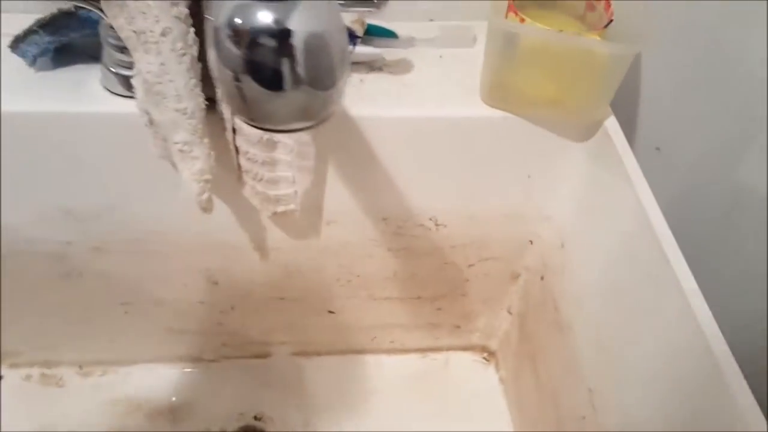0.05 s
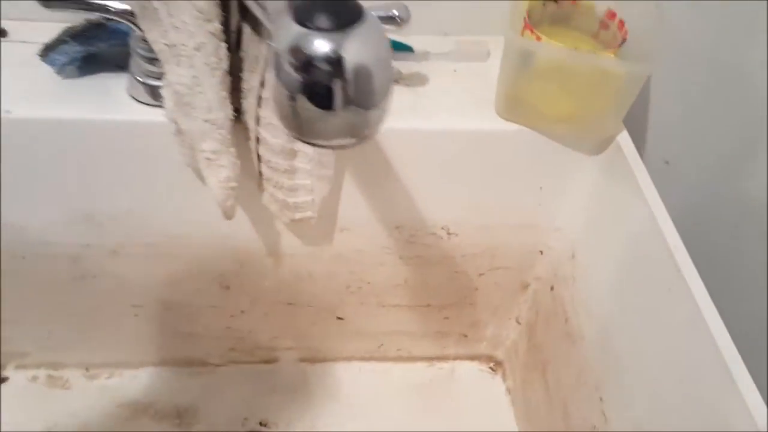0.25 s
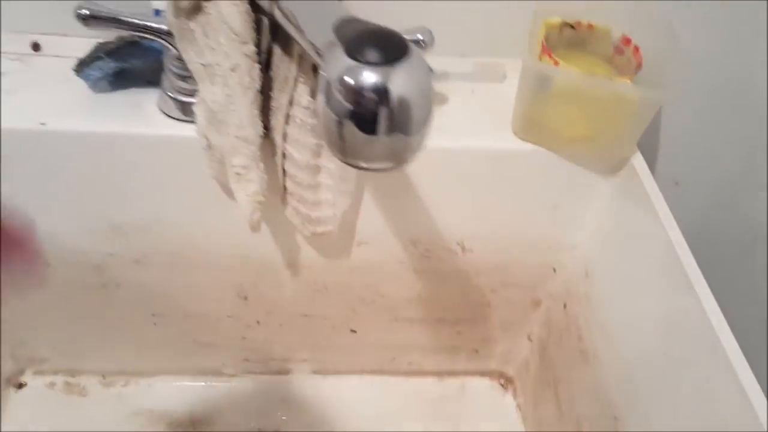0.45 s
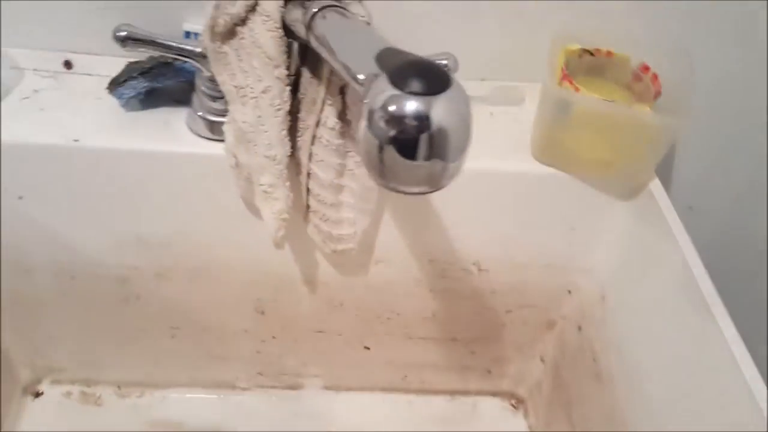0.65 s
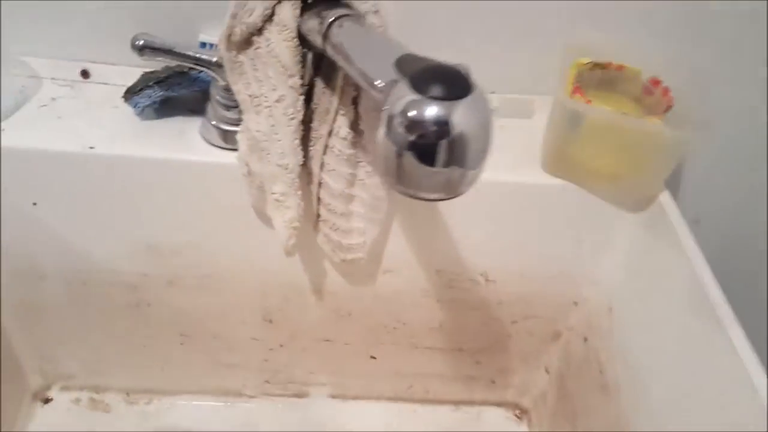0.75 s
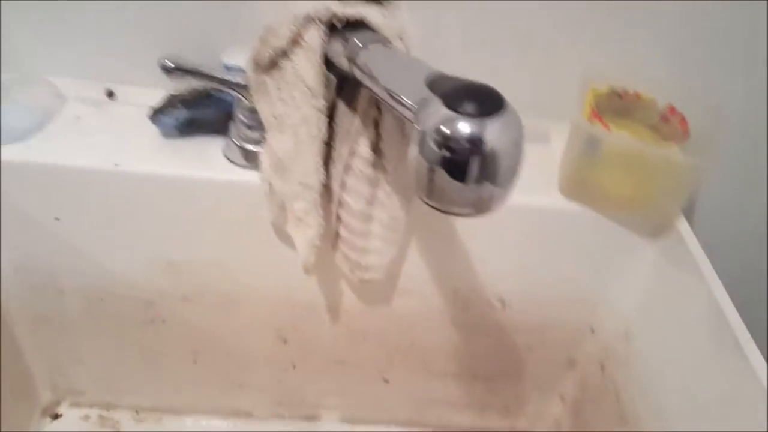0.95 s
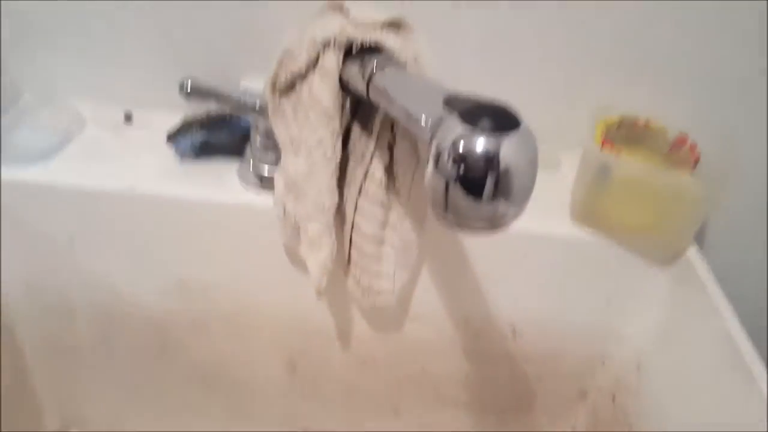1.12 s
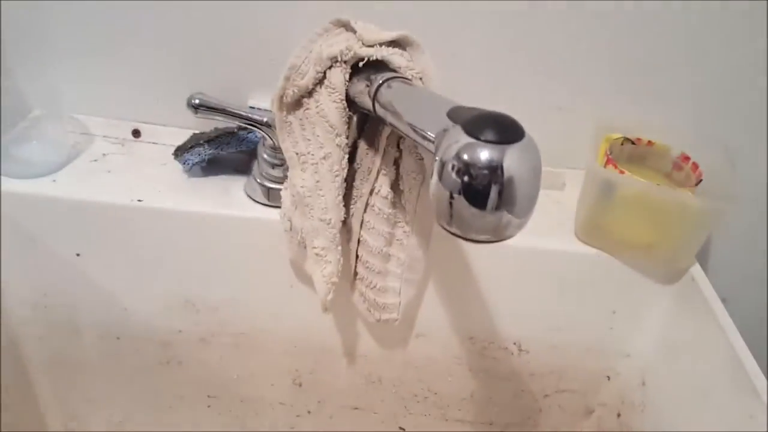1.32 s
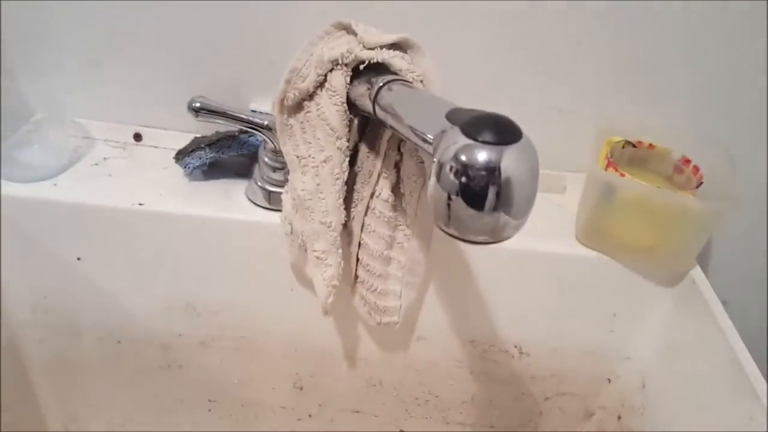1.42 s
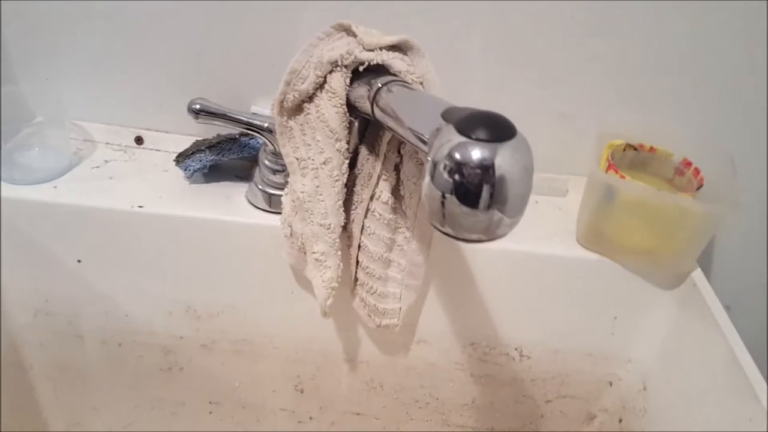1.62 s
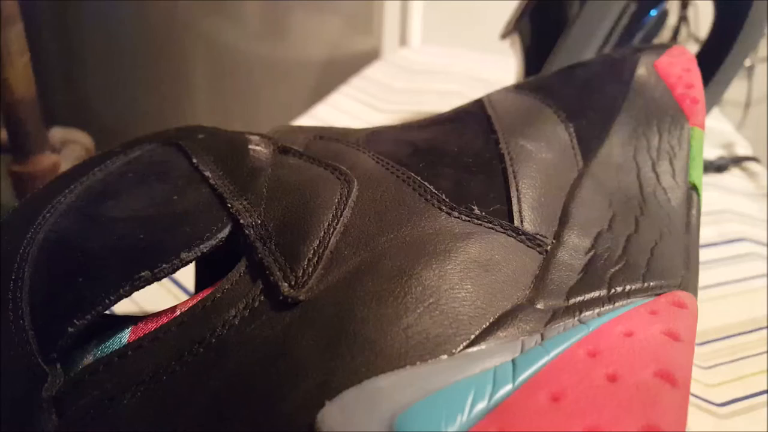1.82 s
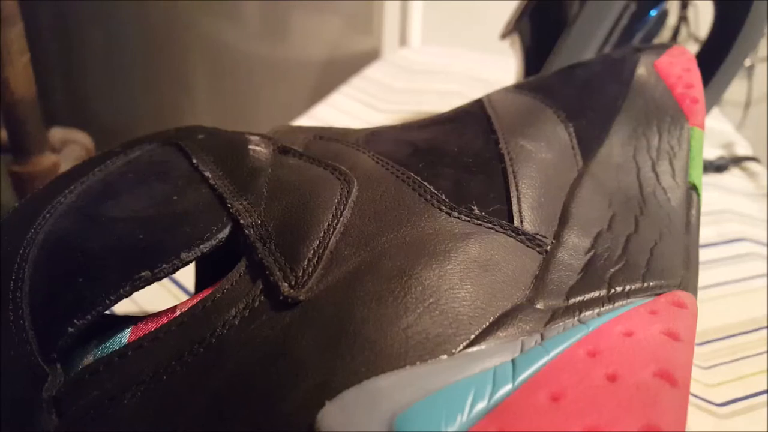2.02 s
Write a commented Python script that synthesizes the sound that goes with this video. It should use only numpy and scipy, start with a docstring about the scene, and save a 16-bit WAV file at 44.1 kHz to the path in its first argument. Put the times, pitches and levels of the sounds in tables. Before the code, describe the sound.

Last water drains from a sink with hollow gulps and plinks, small plastic creaks close by.

```python
"""Last water down a sink drain

Water gurgles out of a plastic utility sink: gulps are enveloped noise, plinks of trapped air are short tones,
and the pipe rings as resonances driven by random drops, while the drain's air column booms as a wavering sine.
A hand-held camera creaks at the right as struck modes with bright ticks, and knocks dully once as a short tone;
rumble, hush and a low room hum are filtered noise under all. The sound is then cut to silence.
"""
import sys
import numpy as np
from scipy import signal
from scipy.io import wavfile
from scipy.ndimage import uniform_filter1d

SR = 44100
rng = np.random.default_rng(int(sys.argv[2]) if len(sys.argv) > 2 else 0)


def generate_wav(signal):
    """Clip the signal to [-1, 1] and save it as 16-bit WAV at the path in sys.argv[1]."""
    frames = np.transpose(np.atleast_2d(signal))
    scaled = np.clip(frames, -1, 1) * 32767
    pcm = np.round(scaled).astype(np.int16)
    wavfile.write(sys.argv[1], SR, pcm)


N = 91110  # samples

# Stereo field of the noises: (frequency [Hz], left-right likeness [0-1])
LIKENESS = [(60, 0.57), (150, 1), (700, 0.21), (15000, 0.067)]
# Stereo balance of the noises: (frequency [Hz], left minus right [dB])
LEAN = [(60, 2), (1300, 0.5), (15000, 3)]
LEFT_LAG_S = -0.00033  # negative: the left channel leads

# Room rumble over time: (time [s], level [dB])
RUMBLE = [(0, -41.5), (.4, -54), (.7, -51), (1.2, -48.5), (1.68, -53.5), (1.71, -58)]
# Rumble spectrum: (frequency [Hz], relative density [dB])
RUMBLE_SHAPE = [(25, -40.5), (58, -1), (90, -27), (107, 4), (135, -4.5), (165, -1.5), (210, -17.5)]
# Room hush spectrum: (frequency [Hz], relative density [dB])
HUSH_SHAPE = [(430, -30.5), (650, 8.5), (1000, 3.5), (2400, -.5), (4400, -7), (4800, -24), (15900, -54.5)]
HUSH_DB, RUMBLE_PATCHY_DB, HUSH_PATCHY_DB = -55, 2.0, 2.0
# Room hum, one resonance: (frequency [Hz], width [Hz], left minus right [dB], likeness [0-1])
HUM = (330, 18, 0, .8)
HUM_DB = -54.5

# Camera creaks: (time [s], peak level before CREAK_DB [dB])
CREAKS = [(0.736, -26.5), (0.977, -33), (1.021, -26.5), (1.132, -30.5), (1.167, -23.5), (1.243, -23.5),
          (1.314, -34), (1.327, -30.5), (1.353, -27), (1.372, -28.5), (1.388, -22), (1.403, -27.5),
          (1.426, -27.5), (1.433, -28.5), (1.457, -29.5), (1.463, -35.5), (1.473, -30.5), (1.48, -20.5),
          (1.493, -34), (1.519, -34), (1.528, -42), (1.55, -42), (1.564, -30), (1.569, -21.5),
          (1.588, -36.5), (1.598, -33), (1.616, -32), (1.618, -15.5), (1.631, -26.5), (1.643, -31),
          (1.647, -19), (1.66, -23), (1.668, -32.5), (1.673, -21), (1.68, -26)]
# Modes of the snap: (frequency [Hz], relative level [dB], 60 dB decay time [s])
SNAP_MODES = [(865, -1, 0.015), (1785, 6, 0.0038), (3416, 0.5, 0.0086)]
# Modes of the plastic shell: (frequency [Hz], relative level [dB], 60 dB decay time [s])
SHELL_MODES = [(370, -9, .02), (667, -8, 0.065), (1080, -8.5, 0.052), (1366, -13.5, 0.042),
               (1880, -15.5, 0.037), (2960, -5, 0.016)]
# Level of the bright ticks, before a doubling of amplitude: (time [s], tick level [dB])
TICK = [(.7, -48.5), (1.16, -45), (1.48, -43.5), (1.5, -49.5), (1.6, -38), (1.68, -40)]
CREAK_DB, CREAK_LEFT_DB = 9, -20  # added to every creak; left relative to right
TICK_LOW_HZ, TICK_HIGH_HZ, TICK_T60_S = 4500, 13000, .007
AFTERSLIP_S = .0045  # a slip this soon after another has no tick
SLIP_S, JUDDER, JUDDER_S = .0001, .16, .004  # push width, noise share and its decay time
COLOUR_SPREAD_DB = 50  # per unit of detuning: each slip favours other modes

# Air column of the drain: (time [s], level [dB])
BOOM = [(0, -41.5), (.16, -51.5), (.29, -40.5), (.35, -50), (.396, -32), (.435, -45.5), (.48, -54),
        (.62, -49.5), (.7, -45), (.83, -59), (.865, -27.5), (.89, -30), (.926, -55), (1.014, -42.5),
        (1.08, -64.5)]
BOOM_HZ, BOOM_WAVER_HZ = 247.9, 7.6
BOOM_LEAN_DB, BOOM_LEAD_RAD = -3, 0.25  # left minus right; left phase lead

# Pipe modes: (frequency [Hz], width [Hz], left minus right [dB], left-right likeness [0-1])
PIPE = [(992, 33, -10.5, 0.1), (1803, 34, 1.5, 0.7), (2782, 40, -5.5, 0.4)]
# Steady trickle: (time [s], body level [dB], treble level [dB])
TRICKLE = [(0, -52, -55.5), (.55, -52.5, -58), (.71, -55.5, -63.5), (.82, -54, -62), (.95, -47.5, -60.5),
           (1.35, -51.5, -62), (1.68, -45, -55), (1.7, -59, -67.5)]
# Ringing of each pipe mode relative to the trickle's body: level [dB]
TRICKLE_MODES_DB = [-0.5, -2, -11]
DROPS_PER_S, DROP_SPREAD_DB = 1200, 3.5

# Short tones: plinks of trapped air, and at 0.737 s the dull knock of a camera creak:
# (time [s], pitch [Hz], peak level [dB], length [s])
SHORT_TONES = [(.009, 982, -30.5, 0.0084), (.01, 6840, -35.5, 0.0085), (.012, 3650, -43.5, 0.015),
               (.085, 1046, -26, 0.0089), (.151, 1020, -26, 0.017), (.158, 2720, -48, 0.037),
               (.178, 984, -43, .025), (.213, 1053, -30, 0.012), (.385, 998, -31, 0.023),
               (.385, 1740, -45, 0.022), (.44, 2830, -45, 0.016), (.445, 1009, -37, 0.021),
               (.495, 1008, -36, 0.016), (.553, 1021, -37, 0.02), (.555, 2480, -44.5, 0.012),
               (.566, 3140, -67, 0.0075), (0.737, 665, -25, 0.0045), (.782, 1050, -35, 0.01),
               (.849, 695, -32.5, 0.021), (.853, 2776, -32.5, 0.012), (.857, 1826, -29.5, 0.019),
               (.888, 480, -38, 0.014), (.94, 997, -35, 0.037), (.985, 1000, -32.5, 0.037),
               (1.052, 1018, -34, 0.019), (1.183, 346, -36, 0.019), (1.225, 1741, -32, 0.016),
               (1.25, 1736, -26, 0.019), (1.287, 1730, -31, 0.013)]
TONE_RISE, TONE_LEAN_DB = 0.42, -3.5  # rise as a share of the length; left minus right
BUBBLES_PER_S, BUBBLE_LOW_HZ, BUBBLE_HIGH_HZ = 300, 900, 4500
BUBBLE_S = .014  # length at 1 kHz
BUBBLE_DB, BUBBLE_TILT_DB = -4, -2  # level relative to the trickle's body; change per octave

# Gulps: (time [s], splash level before SPLASH_DB [dB], spray level before SPRAY_DB [dB], length [s])
GULPS = [(.009, -12, -36.5, 0.0058), (.086, -19.5, -45, 0.012), (0.209, -13, -38.5, 0.0078),
         (0.385, -19.5, -57, 0.022), (0.434, -20, -53, 0.019), (0.559, -25, -46, 0.0048),
         (0.602, -21, -45, 0.015), (0.663, -18, -46, 0.023), (0.846, -12, -47.5, .028),
         (0.879, -20, -46.5, 0.032), (0.941, -17, -43, 0.018), (0.967, -20.5, -43, 0.035),
         (1.088, -29, -46, 0.018), (1.182, -18.5, -51, .015), (1.22, -20.5, -50.5, 0.045),
         (1.255, -23, -45.5, 0.022), (1.283, -24, -49, 0.016)]
# Splash spectrum: (frequency [Hz], relative density [dB])
SPLASH_SHAPE = [(71, -50.5), (120, 17), (1000, 11.5), (1350, 6.5), (2850, 4.5), (3800, -6), (5000, -19.5)]
# Treble spray spectrum: (frequency [Hz], relative density [dB])
SPRAY_SHAPE = [(2350, -41.5), (4000, -5.5), (5880, -3), (12100, -8), (15100, -13.5), (15800, -17)]
SPLASH_DB, SPRAY_DB = -22, -8  # added to every gulp
GULP_RISE = .2  # share of the length

CUT_S, OFFSET, EDGE_HZ = 1.822, -.00055, 15950  # end of sound, steady offset, band limit


def amp(db):
    """Decibel law: twenty decibels are a factor of ten in amplitude."""
    return 10 ** (np.asarray(db) / 20)


def evened(x):
    """Normalization to unit rms."""
    return x / np.sqrt(np.mean(x ** 2) + 1e-20)


def read(points, hz):
    """Interpolation on a logarithmic frequency axis."""
    f, value = np.transpose(points)
    return np.interp(np.log(hz + 1), np.log(f + 1), value)


def curve(table, column=1):
    """Amplitude envelope: gain over time from one decibel column."""
    rows = np.array(table)
    return amp(np.interp(np.arange(N) / SR, rows[:, 0], rows[:, column]))


def add(mix, s, sound):
    """Superposition: adds a sound to the mix from time s on."""
    part = mix[..., round(s * SR):][..., :sound.shape[-1]]
    part += sound[..., :part.shape[-1]]


def swell(u, rise):
    """Pulse envelope: a straight rise, then a Gaussian fall."""
    return np.clip(u / rise, 0, 1) * np.exp(-np.maximum(u - rise, 0) ** 2 * 2)


def noise(shape, patchy_db, size=512):
    """Spectral shaping: random spectra give two partly coherent noises with drifting patches; rms 1."""
    frames, hz = N * 4 // size + 5, np.fft.rfftfreq(size, 1 / SR)
    a, b, c, d, patches = rng.standard_normal((frames, len(hz), 5)).T
    patches = uniform_filter1d(patches, size=12, axis=0)
    patches = evened(uniform_filter1d(patches, size=10, axis=1))
    same = np.clip(read(LIKENESS, hz), -1, 1)[:, None]
    lean = amp(read(LEAN, hz) / 2)[:, None]
    lag = np.exp(-2j * np.pi * hz * LEFT_LAG_S)[:, None]
    left = a + 1j * b
    right = same * left + np.sqrt(1 - same ** 2) * (c + 1j * d)
    spectra = np.array([left * lean * lag, right / lean])
    inside = ((hz >= shape[0][0]) & (hz <= shape[-1][0]))[:, None]
    spectra *= inside * amp(read(shape, hz)[:, None] + patchy_db * patches)
    return evened(signal.istft(spectra, nperseg=size, noverlap=size * 3 // 4)[1][:, :N])


def ring(drive, hz, width, lean_db, same):
    """Driven resonance: two noises excite one damped pole and mix into a partly coherent pair; rms 1."""
    same = np.clip(same, 0, 1)
    pole = np.exp((-np.pi * width + 2j * np.pi * hz) / SR)
    a, b = signal.lfilter([1], [1, -pole], drive, axis=1)
    left = (same * a + np.sqrt(1 - same ** 2) * b) * np.exp(-2j * np.pi * hz * LEFT_LAG_S)
    return evened(np.array([left.real * amp(lean_db / 2), a.real / amp(lean_db / 2)]))


def room():
    """Broadband background: a rumble of changing level and a steady hush, both shaped noise."""
    rumble = noise(RUMBLE_SHAPE, RUMBLE_PATCHY_DB, size=4096) * curve(RUMBLE)
    return rumble + amp(HUSH_DB) * noise(HUSH_SHAPE, HUSH_PATCHY_DB, size=2048)


def room_hum():
    """Narrow-band noise: white noise through one lightly damped resonance hums at its pitch."""
    return amp(HUM_DB) * ring(rng.standard_normal((2, N)), *HUM)


def struck(modes, detune):
    """Modal superposition: exponentially dying sines, each a little off in pitch and level."""
    t = np.arange(3000) / SR
    total = 0
    for (hz, db, t60), pitch, colour in zip(modes, detune, detune[::-1]):
        decay = amp(db + COLOUR_SPREAD_DB * (colour - 1) - 60 * t / t60)
        total = total - decay * np.sin(2 * np.pi * hz * pitch * t)
    return total


def creaks():
    """Stick-slip: each slip excites snap and shell modes; a bright tick joins unless it closely follows another."""
    out, t = np.zeros(N), np.arange(600) / SR
    detune = rng.uniform(.92, 1.08, (len(CREAKS), 2, 6))
    chance = rng.standard_normal((len(CREAKS), 2, len(t)))
    band = signal.butter(2, (TICK_LOW_HZ, TICK_HIGH_HZ), "band", fs=SR)
    gaps = np.diff([0] + [s for s, db in CREAKS])
    for (s, db), gap, (snap_tune, shell_tune), (shake, fizz) in zip(CREAKS, gaps, detune, chance):
        push = np.exp(-(t / SLIP_S - 2) ** 2) + JUDDER * shake * np.exp(-t / JUDDER_S)
        # the shell's modes scatter a quarter as much as the snap's
        modes = struck(SNAP_MODES, snap_tune) + struck(SHELL_MODES, 0.762 + shell_tune / 4)
        slip = signal.fftconvolve(modes, push)
        add(out, s, amp(db + CREAK_DB) * slip / abs(slip).max())
        tick_db = np.interp(s, *np.transpose(TICK)) - 60 * t / TICK_T60_S
        tick = 2 * amp(tick_db) * signal.lfilter(*band, fizz)
        add(out, s, (gap > AFTERSLIP_S) * tick)
    out = signal.lfilter(*signal.butter(2, 260.0, "high", fs=SR), out)
    return np.array([amp(CREAK_LEFT_DB) * out, out])


def boom():
    """Frequency modulation: the air column sounds a low sine of wavering pitch, which fades out at the end."""
    waver = uniform_filter1d(rng.standard_normal(N), size=900)
    waver = evened(uniform_filter1d(waver, size=900))
    phase = 2 * np.pi * np.cumsum(BOOM_HZ + BOOM_WAVER_HZ * waver) / SR
    left = np.sin(phase + BOOM_LEAD_RAD) * amp(BOOM_LEAN_DB / 2)
    right = np.sin(phase) / amp(BOOM_LEAN_DB / 2)
    fade_out = (BOOM[-1][0] + 0.11, -90)
    return np.sqrt(2) * np.array([left, right]) * curve(list(BOOM) + [fade_out])


def trickle(splash, spray):
    """Random excitation: a stream of small drops keeps the pipe modes ringing under a thin wash."""
    body = curve(TRICKLE, column=1)
    out = splash * body + spray * curve(TRICKLE, column=2)
    for mode, db in zip(PIPE, TRICKLE_MODES_DB):
        size = amp(DROP_SPREAD_DB * np.minimum(rng.exponential(1, (2, N)), 5))
        falls = rng.random((2, N)) < DROPS_PER_S / SR
        drops = size * rng.standard_normal((2, N)) * falls
        out += amp(db) * ring(drops, *mode) * body
    return out


def short_tone(hz, db, length, lean_db, glide, phase):
    """Tone burst: a short sine swells and dies, gliding if asked, and reaches the left channel first."""
    t = np.arange(0, 2 * length, 1 / SR) - np.array([[LEFT_LAG_S], [0]])
    tone = np.sin(2 * np.pi * (hz * t * (1 + glide * t / length) + phase))
    return amp(db + np.array([[lean_db], [-lean_db]]) / 2) * swell(t / length, TONE_RISE) * tone


def plinks_and_knock():
    """Tone bursts of fixed pitch: plinks of trapped air resonating, and one dull knock of the camera."""
    out = np.zeros((2, N))
    for (s, hz, db, length), phase in zip(SHORT_TONES, rng.random(len(SHORT_TONES))):
        add(out, s, short_tone(hz, db, length, TONE_LEAN_DB, 0, phase))
    return out


def bubbles():
    """Bubble resonance: many small tones of rising pitch, strewn over two seconds, follow the trickle."""
    out = np.zeros((2, N))
    for when, pitch, size, place, glide, phase in rng.random((2 * BUBBLES_PER_S, 6)):
        hz = BUBBLE_LOW_HZ * (BUBBLE_HIGH_HZ / BUBBLE_LOW_HZ) ** pitch
        db = BUBBLE_TILT_DB * np.log2(hz / 1000) - DROP_SPREAD_DB * np.log(size + .01)
        length = BUBBLE_S * np.sqrt(1000 / hz)
        add(out, 2 * when, short_tone(hz, db, length, 12 * place - 8, .04 * glide, phase))
    return amp(BUBBLE_DB) * out * curve(TRICKLE, column=1)


def gulps(splash, spray):
    """Amplitude modulation: each gulp briefly opens the splash and the spray."""
    body, top, t = np.zeros(N), np.zeros(N), np.arange(0, .15, 1 / SR)
    for s, splash_db, spray_db, length in GULPS:
        burst = swell(t / max(length, .004), GULP_RISE)
        add(body, s, amp(splash_db + SPLASH_DB) * burst)
        add(top, s, amp(spray_db + SPRAY_DB) * burst)
    return splash * body + spray * top


def scene():
    """Linear superposition of all sources; gulps and trickle share the same splash and spray noise."""
    splash, spray = noise(SPLASH_SHAPE, patchy_db=2.5), noise(SPRAY_SHAPE, patchy_db=2.5)
    background = room() + room_hum()
    water = boom() + trickle(splash, spray) + bubbles() + gulps(splash, spray)
    return background + creaks() + plinks_and_knock() + water


def record(dry):
    """Linear filtering: microphones lose the deepest bass; then a steady offset, the cut and a band limit."""
    t = np.arange(N) / SR
    thin = signal.lfilter(*signal.butter(2, 55.0, "high", fs=SR), dry)
    fade = np.sin(np.pi / 2 * np.clip((CUT_S - t) / .016, 0, 1)) ** 2  # 16 ms down to silence
    cut = (thin + OFFSET) * fade
    low_pass = signal.firwin(511, EDGE_HZ, window=("kaiser", 9), fs=SR)
    return signal.oaconvolve(cut, low_pass[None], "same")


dry = scene()
out = record(dry)
generate_wav(out)
```